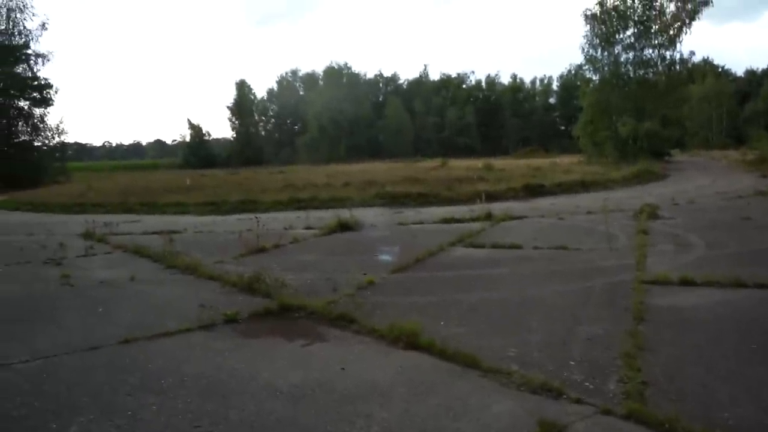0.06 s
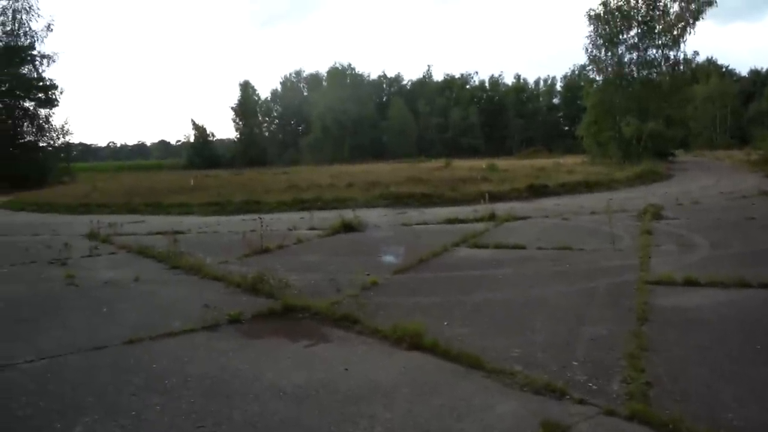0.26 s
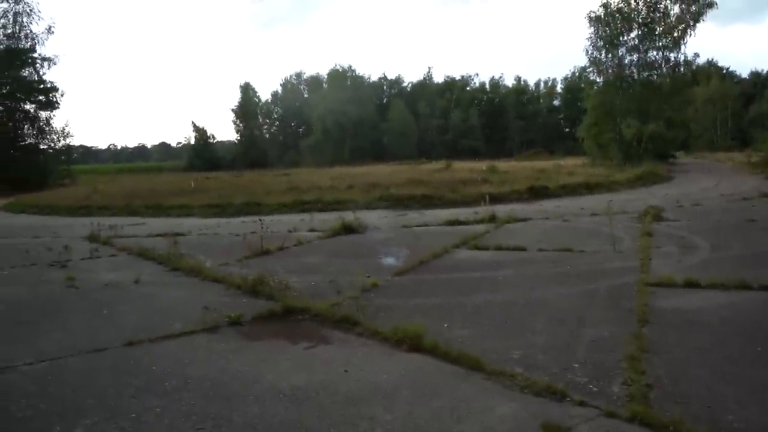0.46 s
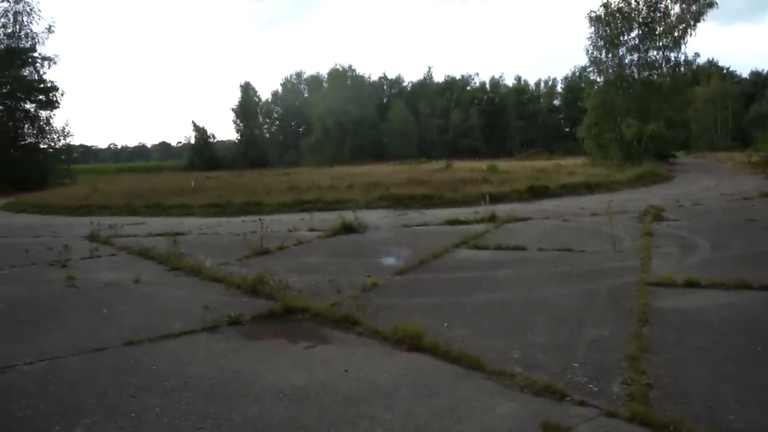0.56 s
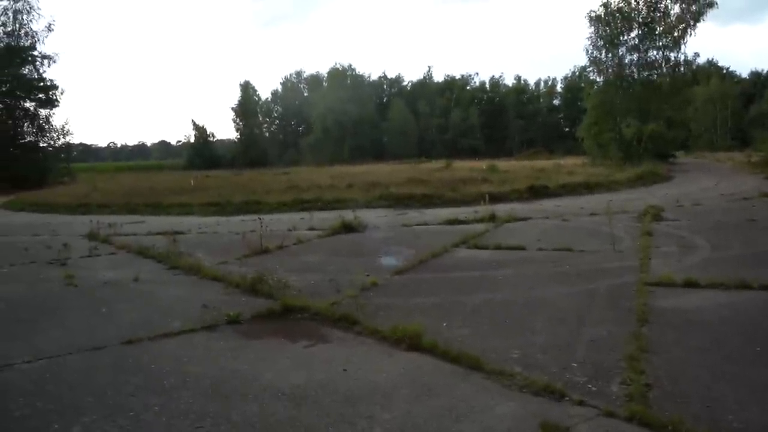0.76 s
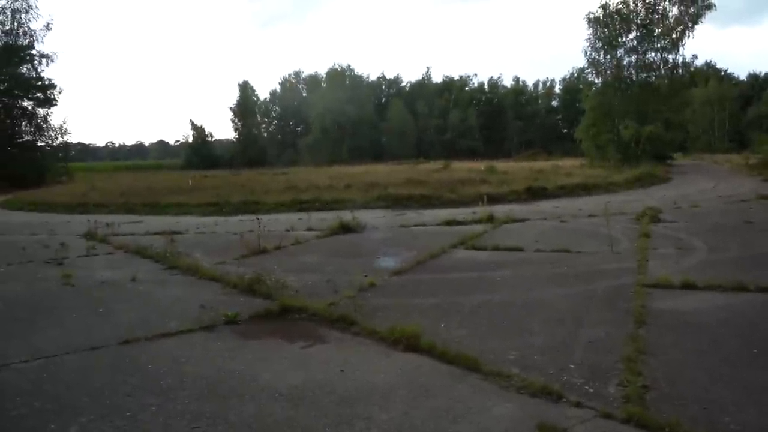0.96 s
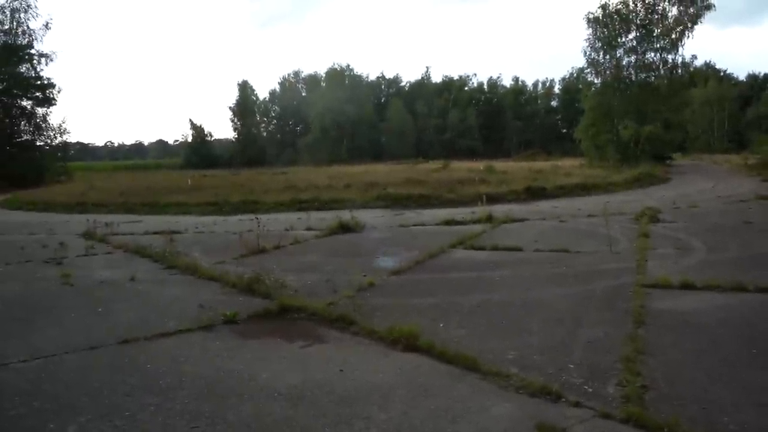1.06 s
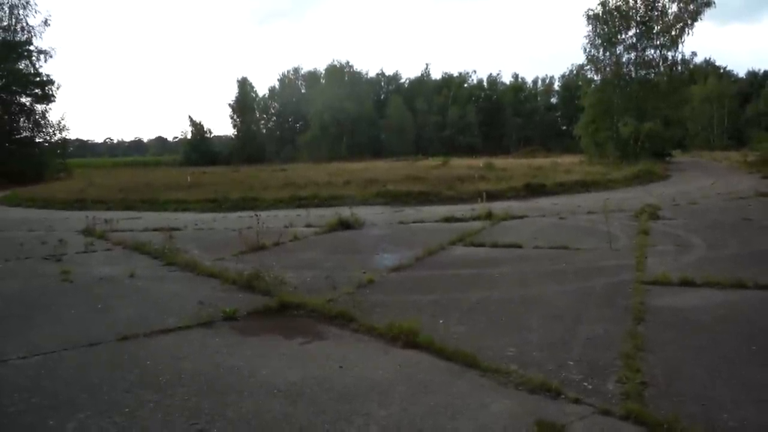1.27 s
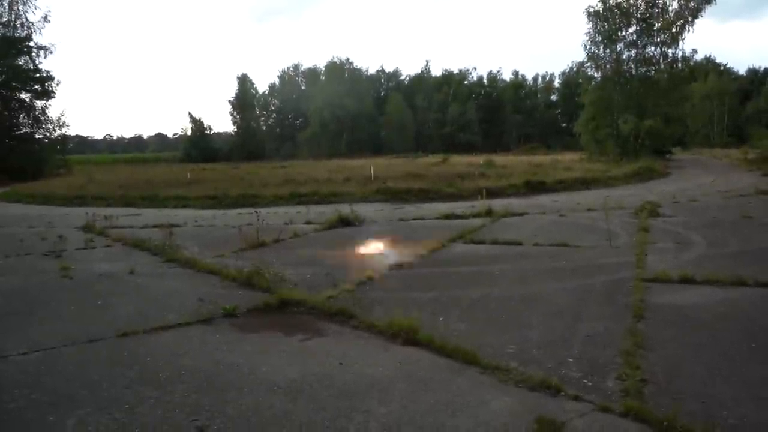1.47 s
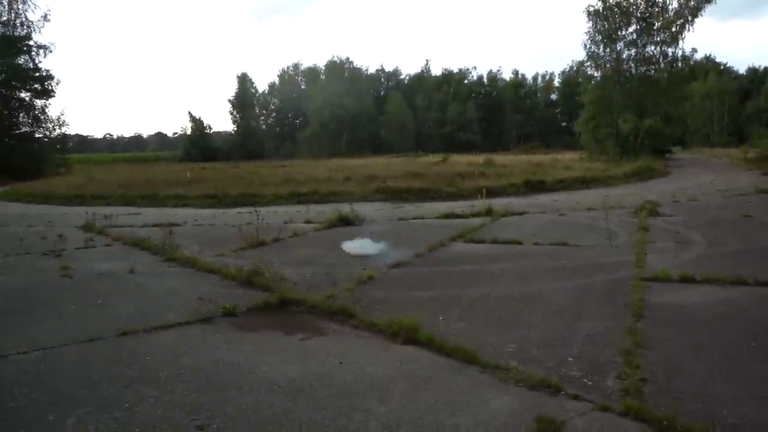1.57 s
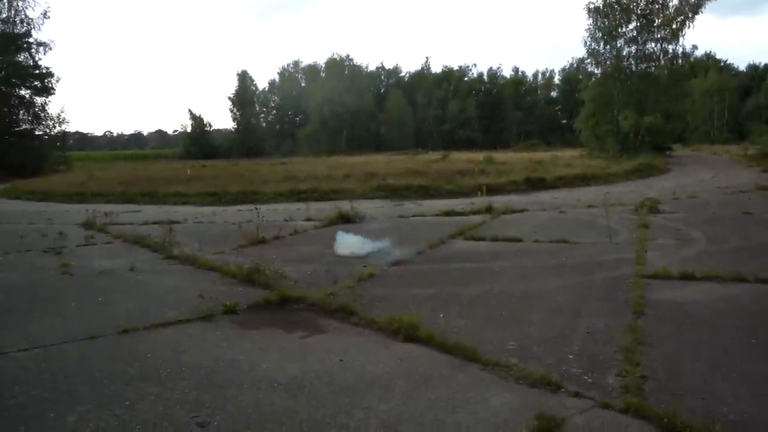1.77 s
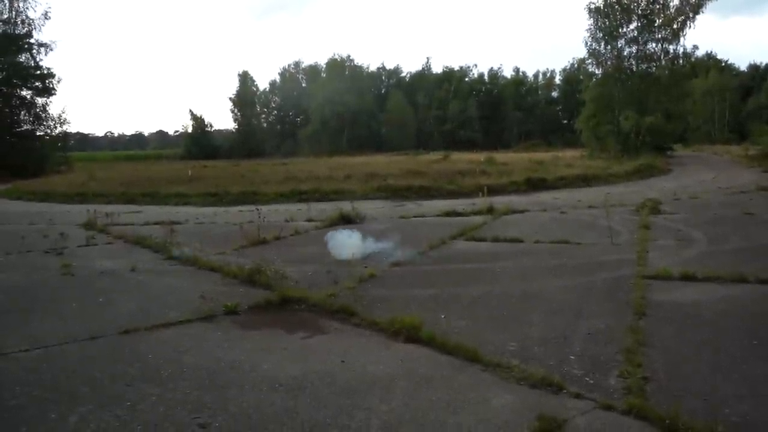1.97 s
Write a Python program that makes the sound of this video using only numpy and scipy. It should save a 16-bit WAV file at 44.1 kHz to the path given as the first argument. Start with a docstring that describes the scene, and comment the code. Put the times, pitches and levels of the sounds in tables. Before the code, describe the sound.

A firecracker's fuse hisses very faintly with tiny spits while the camera is lightly handled; after it fades, one violent, clipped bang bursts in a clearing and rolls back from the woods as a clattering roar.

```python
"""A clearing among grass and woods: a firecracker on a concrete slab hisses and spits, falls quiet, and bursts.
The fuse is coloured noise with gains that fluctuate; its sparks are short bursts of noise around a high pitch.
The shock is a push and a suction that rings the microphone housing and saturates a camera's microphones.
Grass scatters it back as a bright rush, the woods as a roar with separate slaps, duller with travel time.
Rustle, scuffs and taps from handling lie beneath, with light wind and a distant wash, all shaped noise or modes."""
import sys
import numpy as np
from scipy import signal
from scipy.fft import rfft, irfft, next_fast_len
from scipy.io import wavfile
from scipy.ndimage import map_coordinates

SR = 44100
rng = np.random.default_rng(int(sys.argv[2]) if len(sys.argv) > 2 else 0)


def int16_out(signal):
    """Quantize to a 16-bit WAV file."""
    q = np.round(np.clip(np.atleast_2d(signal).T, -1, 1) * 32767)
    wavfile.write(sys.argv[1], SR, q.astype(np.int16))


N = 89258
BANG_S = 1.5933

# Hiss of the fuse, before FUSE_DB: [t/s, level/dB] and spectrum [f/Hz, level/dB]
FUSE_ENVELOPE = [(0, -42), (.03, -60), (.11, -57.5), (.16, -55.5), (.22, -58.5), (.346, -63), (.38, -58.5),
                 (.66, -61), (.72, -64), (.88, -62.5), (.994, -65.5), (1.122, -63), (1.342, -64),
                 (1.376, -69.5), (1.51, -69), (1.55, -75.5)]
FUSE_SPECTRUM = [(1500, -9), (3500, -12.5), (4600, -8.5), (5600, -1.5), (8000, 1.5), (9800, -3.5),
                 (11000, -20.5), (15500, -14.5)]
FUSE_DB, FUSE_ROUGH_DB = 2, 1.9  # added level, depth of the sputter
# Treble of the fuse's hiss, before SIZZLE_DB: [t/s, level/dB] and spectrum [f/Hz, level/dB]
SIZZLE_ENVELOPE = [(0.0, -63), (0.038, -63), (0.11, -69), (0.15, -61), (0.29, -77), (0.42, -65),
                   (0.958, -72), (0.996, -83), (1.048, -72), (1.238, -63.5), (1.416, -77), (1.55, -77)]
SIZZLE_SPECTRUM = [(3000, -25), (6000, 2), (11000, 0), (14000, -3), (16000, -5)]
SIZZLE_DB, SIZZLE_ROUGH_DB = 2.5, 2.2
FUSE_CLUMPS_PER_S = 350
# Sparks from the fuse: [t/s, level/dB, left over right/dB, f/Hz]
SPARKS = [(0.1283, -47, 8, 13500), (0.137, -53, 4, 11000), (0.151, -49, 10, 12100),
          (0.4167, -43.5, -5, 8050), (1.1169, -45, -9, 10000), (1.1408, -41.5, -9, 9600)]
SPARK_HALF_WIDTH_HZ, SPARK_T60_S = 960, 0.0035  # offset at which the gain is halved, decay time

# Rustle at the camera: [t/s, level/dB] and spectrum [f/Hz, level/dB]
RUSTLE_ENVELOPE = [(0, -64), (.18, -62), (.26, -68), (.36, -66), (.44, -72), (.72, -67.5), (.85, -65),
                   (.96, -67), (1.01, -87), (1.55, -69)]
RUSTLE_SPECTRUM = [(300, -8), (1400, 0), (2400, -5), (4000, -13.5), (9000, -36)]
# Scuffs at the camera, before SCUFF_DB: [t/s, level/dB, low-pass cutoff f/Hz, t60/s]
SCUFFS = [(.008, -43.5, 3000, 0.085), (0.322, -44.5, 1470, .06), (.487, -50, 1000, 0.065),
          (0.841, -51, 2200, 0.028), (0.86, -50, 2400, .02), (0.891, -43, 2700, .016),
          (0.8963, -46, 2440, 0.013), (0.9, -47.5, 2410, 0.016), (1.466, -52, 2000, 0.028)]
SCUFF_DB = 0.5
# Spectrum of the scuffs before their low-pass: [f/Hz, level/dB]
GRIT_SPECTRUM = [(100, -22), (500, 0), (2800, -3.5), (9000, -39)]

# Distant wash of the countryside, before its treble roll-off: spectrum [f/Hz, level/dB]
WASH_SPECTRUM = [(59, -13), (100, -1), (230, -7.5), (286, -10.5), (377, -11.5), (546, -8.5), (688, -6),
                 (1090, -5), (1660, -16.5), (4000, -30.5), (5200, -50), (8800, -120)]
WASH_DB, WASH_HALF_GAIN_HZ, WASH_LEAD_S = -57, 3570, 0.00015
# Wind at the microphones: [t/s, level/dB] and spectrum [f/Hz, level/dB]
WIND_ENVELOPE = [(0.0, -56.5), (.1, -51.5), (0.45, -57.5), (0.632, -49), (0.694, -58), (0.795, -48.5),
                 (0.922, -60), (0.975, -48), (1.02, -60), (1.06, -59), (1.235, -62), (1.26, -44),
                 (1.335, -45), (1.358, -59), (1.55, -51), (1.7, -47)]
WIND_SPECTRUM = [(10, -3), (25, -6), (48, 4), (75, -11), (130, -18), (300, -61), (1000, -80)]
# Left-right correlation of fuse, handling and ambient noise: [f/Hz, correlation/1]
AMBIENT_CORRELATION = [(60, 1), (250, 0.97), (1000, 0.83), (3000, 0.033), (8000, 0.52)]

# Taps on the camera: [t/s, level/dB]
TAP_EVENTS = [(0.3184, -42), (.3208, -36), (0.3239, -37.5), (0.4872, -45.5), (.4905, -49)]
# Modes of the camera body: [f/Hz, level relative to the tap/dB, t60/s]
BODY_MODES = [(197, -6, 0.056), (462, -8.5, 0.11), (780, -5.5, 0.052), (1380, -20, 0.038)]

SHOCK_DB, SHOCK_S = 0, 0.001  # level before saturation, length of the push
BOUNCE_DB, BOUNCE_S = -1, 0.002193  # the shock off the slab: level relative to the shock, delay
CRACK_DB, CRACK_S = -5.5, 0.0021  # tearing edge: noise level before saturation, time to fall to 1/e
OVERLOAD_DB = -5  # ceiling of the saturation, before the microphones' colour
# Modes of the microphone housing before saturation: [f/Hz, level/dB, t60/s]
HOUSING_MODES = [(218, -20, 0.0135), (480, -12.5, 0.006), (998, -10.5, 0.0064), (2370, 1.5, 0.0033)]
# Colour of the overloaded microphones: [f/Hz, gain/dB]
MIC_RESPONSE = [(20, -5), (140, 4), (300, 3), (800, 8.5), (1500, 2), (2400, -2.5), (3800, -11.5),
                (5000, -7), (10000, -17), (15500, -16)]
# Low shudder after the shock: spectrum [f/Hz, level/dB]
THUMP_SPECTRUM = [(12, 2), (35, -16), (110, -10), (220, -8), (500, -19), (2000, -70)]
THUMP_DB, THUMP_T60_S, THUMP_RISE_S = -19, 0.088, 0.0064  # level before the envelope, its decay and rise

# Echo from grass and slab joints, before air loss: [t/s, level/dB]
GRASS_ENVELOPE = [(1.598, -63), (1.607, -31.5), (1.616, -22), (1.648, -24.5), (1.664, -23.5), (1.682, -20),
                  (1.73, -22), (1.81, -19), (2.02, -29.5)]
# Spectrum [f/Hz, level/dB] and balance [f/Hz, left over right/dB] of that echo
GRASS_SPECTRUM = [(100, -16), (400, -14), (1500, -3), (3300, 1), (6500, 3), (10000, 0.5), (15500, -8.5)]
GRASS_BALANCE = [(500, 3), (3000, 1.5), (7000, -2), (13000, 2.5)]
GRASS_ROUGH_DB, GRASS_CLUMPS_PER_S = 1, 110
# Echo from the woods, before air loss: [t/s, level/dB] and spectrum [f/Hz, level/dB]
WOODS_ENVELOPE = [(1.598, -33.5), (1.64, -23), (1.675, -22.5), (1.715, -17.5), (1.80, -15.5), (1.865, -16),
                  (1.93, -16.5), (2.02, -19.5)]
WOODS_SPECTRUM = [(30, -59), (100, -21), (200, -11.5), (400, -2), (680, 0), (1200, -5.5), (1800, -7.5),
                  (3000, -14.5), (6000, -22), (15000, -27)]
WOODS_ROUGH_DB, WOODS_CLUMPS_PER_S = 1.5, 220
# Left-right correlation of echoes and shudder: [f/Hz, correlation/1]
ECHO_CORRELATION = [(100, 1), (200, 1), (380, 0.95), (700, 0.73), (1300, 0.32), (2400, 0.56), (4400, 0.43),
                    (8000, 0.031)]
ECHO_LEAD_S = 0.00015  # the echoes come from the left
# Slaps from single trees and banks, before high-pass and air loss: [t/s, level/dB, f/Hz]
SLAP_EVENTS = [(1.6059, -11, 420), (1.6297, -6, 566), (1.6345, -4, 480), (1.6530, -3, 463),
               (1.6614, -1.5, 580), (1.682, -12.5, 870), (1.6867, -4, 780), (1.711, -9, 790),
               (1.7325, -5.5, 557), (1.7605, -4, 595), (1.782, -14, 560), (1.8065, -2.5, 570),
               (1.8207, -2.5, 480), (1.8524, -6.5, 710), (1.8597, -5, 730), (1.873, -4, 520),
               (1.8981, -5.5, 480), (1.9104, -1.5, 480), (1.9468, -3.5, 660), (1.9683, -6, 630),
               (2.011, -5, 650)]
SLAP_T60_S, SLAP_LEAD_S = 0.0067, 0.0001  # decay, scale of the random left lead
SLAP_LOW_HZ = 190  # trunks reflect little bass
AIR_DB_PER_S, AIR_POWER = 44.5, 1.54  # loss at 10 kHz per second of travel, its exponent in frequency

CEILING, TOP_HZ = 0.75, 16200  # amplitude limit, upper band limit


def amp(db):
    """Level: a gain is ten to the power of dB/20."""
    return 10 ** (np.asarray(db) / 20)


def unit(x):
    """Normalization: scale the mean power to one."""
    return x / np.sqrt(np.mean(x ** 2) + 1e-20)


def along(points, hz):
    """Interpolation of [f/Hz, value] points on a logarithmic frequency axis."""
    f, v = np.transpose(points)
    return np.interp(np.log(hz + 1), np.log(f + 1), v)


def since(s):
    """Elapsed time in seconds after an instant, zero before it."""
    return np.maximum(np.arange(N) / SR - s, 0)


def level(rows):
    """Envelope: gain per sample from [t/s, level/dB] points."""
    return amp(np.interp(np.arange(N) / SR, *np.transpose(rows)))


def fade(t, t60):
    """Exponential damping: a fall of 60 dB in t60, silence before t = 0."""
    return (t > 0) * np.exp(-np.log(1000) * t / t60)


def filtered(x, response):
    """Linear filtering: multiply the spectrum by a response of frequency."""
    m = next_fast_len(N + SR // 2)
    return irfft(rfft(x, m) * response(np.fft.rfftfreq(m, 1 / SR)), m)[..., :N]


def coloured(x, spectrum):
    """Minimum phase: folding the cepstrum makes a causal filter with the given magnitude."""
    m = 2 * next_fast_len(N)
    log_gain = np.log(amp(along(spectrum, np.fft.rfftfreq(m, 1 / SR))))
    cepstrum = irfft(log_gain, m)
    cepstrum[1:m // 2] *= 2
    cepstrum[m // 2 + 1:] = 0
    return irfft(rfft(x, m) * np.exp(rfft(cepstrum)), m)[..., :N]


def panned(db):
    """Level difference: gains of left and right for a left-over-right ratio in dB."""
    return amp(db * np.array([[1], [-1]]) / 2)


def clumps(depth_db, rate):
    """Random modulation: a smooth gain through random knots, depth_db their standard deviation."""
    knots = rng.standard_normal(N // 8)
    return amp(depth_db * map_coordinates(knots, [np.arange(N) * rate / SR], mode="reflect"))


def rush(spectrum, correlation, lead_s=0):
    """Partial coherence: rms-1 stereo noise from shared and opposed parts, the left leading by lead_s."""
    def mid_side_gains(hz):
        angle = np.arccos(np.clip(along(correlation, hz), -1, 1)) / 2
        return amp(along(spectrum, hz)) * [np.cos(angle), np.sin(angle)]

    def lead(hz):
        return np.exp(1j * np.pi * lead_s * np.outer([1, -1], hz))

    mid, side = filtered(rng.standard_normal((2, N)), mid_side_gains)
    return unit(filtered(np.array([mid + side, mid - side]), lead))


def spark(s, db, pan_db, hz):
    """Impulsive emission: a damped burst of narrow-band noise around a high pitch."""
    noise = rng.standard_normal(N)
    snap = unit(filtered(noise, lambda f: 1 / (1 + ((f - hz) / SPARK_HALF_WIDTH_HZ) ** 2)))
    return amp(db) * panned(pan_db) * fade(since(s), SPARK_T60_S) * snap


def fuse():
    """Combustion noise: the fuse hisses, sizzles and throws sparks until it reaches the charge."""
    hiss = amp(FUSE_DB) * level(FUSE_ENVELOPE) * clumps(FUSE_ROUGH_DB, FUSE_CLUMPS_PER_S)
    hiss = hiss * rush(FUSE_SPECTRUM, AMBIENT_CORRELATION)
    sizzle = amp(SIZZLE_DB) * level(SIZZLE_ENVELOPE) * clumps(SIZZLE_ROUGH_DB, FUSE_CLUMPS_PER_S)
    sizzle = sizzle * rush(SIZZLE_SPECTRUM, AMBIENT_CORRELATION)
    sparks = sum(spark(*row) for row in SPARKS)
    return (hiss + sizzle + sparks) * (since(BANG_S) == 0)


def handling():
    """Friction noise: a faint rustle, and low-passed, damped scuffs at the camera."""
    out = level(RUSTLE_ENVELOPE) * rush(RUSTLE_SPECTRUM, AMBIENT_CORRELATION)
    grit = rush(GRIT_SPECTRUM, AMBIENT_CORRELATION)
    for s, db, cutoff_hz, t60 in SCUFFS:
        lowpass = signal.butter(3, cutoff_hz, fs=SR, output="sos")
        dull = signal.sosfilt(lowpass, grit)
        out += amp(db + SCUFF_DB) * unit(dull) * fade(since(s), t60)
    return out


def outdoors():
    """Background noise: a steady distant wash, and light puffs of wind at the microphones."""
    wash = rush(WASH_SPECTRUM, AMBIENT_CORRELATION, WASH_LEAD_S)
    wash = filtered(wash, lambda hz: 1 / (1 + (hz / WASH_HALF_GAIN_HZ) ** 2))
    wind = level(WIND_ENVELOPE) * rush(WIND_SPECTRUM, AMBIENT_CORRELATION)
    return amp(WASH_DB) * unit(wash) + wind


def taps():
    """Modal response: a finger bumps the camera and excites damped modes of its body."""
    out = np.zeros(N)
    for s, db in TAP_EVENTS:
        t = since(s)
        for hz, mode_db, t60 in BODY_MODES:
            out += amp(db + mode_db) * np.sin(2 * np.pi * hz * t) * fade(t, t60)
    return out


def shock_wave(t):
    """Blast pressure: an instant push followed by a longer suction."""
    return (t > 0) * (1 - t / SHOCK_S) * np.exp(-t / SHOCK_S)


def blast():
    """Saturation: shock, slab bounce and housing modes overload the microphones; a low shudder follows."""
    t = since(BANG_S)
    bounce = amp(BOUNCE_DB) * shock_wave(since(BANG_S + BOUNCE_S))
    shock = amp(SHOCK_DB) * (shock_wave(t) + bounce)
    ring = sum(amp(db) * np.sin(2 * np.pi * hz * t) * fade(t, t60) for hz, db, t60 in HOUSING_MODES)
    crack = amp(CRACK_DB) * (t > 0) * np.exp(-(t / CRACK_S) ** 2) * rng.standard_normal((2, N))
    thump_envelope = amp(THUMP_DB) * fade(t, THUMP_T60_S) * (1 - np.exp(-t / THUMP_RISE_S))
    thump = thump_envelope * rush(THUMP_SPECTRUM, ECHO_CORRELATION)
    ceiling = amp(OVERLOAD_DB)
    squashed = ceiling * np.tanh((shock - ring + crack) / ceiling)
    return coloured(squashed, MIC_RESPONSE) + thump


def grass_echo():
    """Diffuse scattering: countless small reflections near the slab arrive as a bright, clumped rush."""
    gain = level(GRASS_ENVELOPE) * clumps(GRASS_ROUGH_DB, GRASS_CLUMPS_PER_S)
    grass = gain * rush(GRASS_SPECTRUM, ECHO_CORRELATION, ECHO_LEAD_S)
    return filtered(grass, lambda hz: panned(along(GRASS_BALANCE, hz)))


def woods_echo():
    """Multiple scattering: countless reflections among the trees merge into a roar."""
    gain = level(WOODS_ENVELOPE) * clumps(WOODS_ROUGH_DB, WOODS_CLUMPS_PER_S)
    return gain * rush(WOODS_SPECTRUM, ECHO_CORRELATION, ECHO_LEAD_S)


def slaps():
    """Discrete reflection: large reflectors each return a short damped wave, earlier at the left."""
    out = np.zeros((2, N))
    sides = rng.uniform(-0.47, 1, len(SLAP_EVENTS))
    for (s, db, hz), side in zip(SLAP_EVENTS, sides):
        t = np.array([since(s - SLAP_LEAD_S * (1 + side)), since(s)])
        out += amp(db) * np.sin(2 * np.pi * hz * t) * fade(t, SLAP_T60_S)
    return signal.sosfilt(signal.butter(2, SLAP_LOW_HZ, "high", fs=SR, output="sos"), out)


def through_air(x):
    """Atmospheric absorption: later echoes have travelled farther and lost more treble."""
    hz, t, z = signal.stft(x, SR, nperseg=256)
    loss_db = AIR_DB_PER_S * np.outer((hz / 10 ** 4) ** AIR_POWER, np.maximum(t - BANG_S, 0))
    return signal.istft(z * amp(-loss_db), SR, nperseg=256)[1][:, :N]


def echoes():
    """Superposition: grass, woods and slaps add, then share the loss in air."""
    diffuse = (grass_echo() + woods_echo()) * (since(BANG_S) > 0)
    return through_air(diffuse + slaps())


def scene():
    """Superposition of all sources at the two microphones."""
    return fuse() + handling() + outdoors() + taps() + blast() + echoes()


def record(dry):
    """Limiting: the camera rounds off the highest peaks, then removes what lies above its band limit."""
    rounded = dry / (1 + (dry / CEILING) ** 8) ** (1 / 8)
    return filtered(rounded, lambda hz: np.clip((TOP_HZ - hz) / 400 + 0.5, 0, 1))


dry = scene()
out = record(dry)
int16_out(out)
```